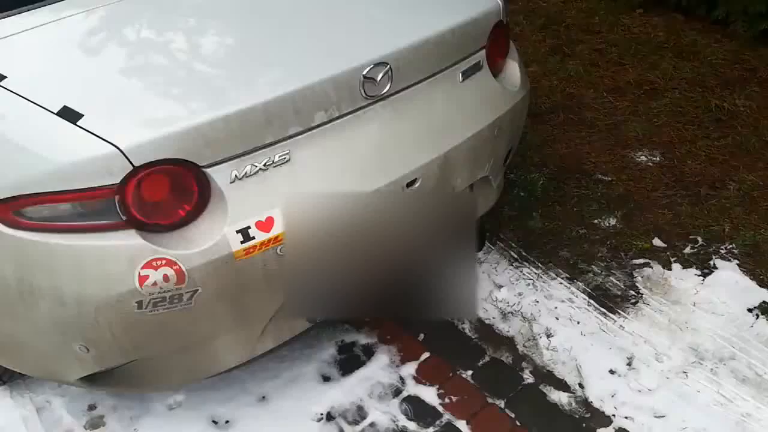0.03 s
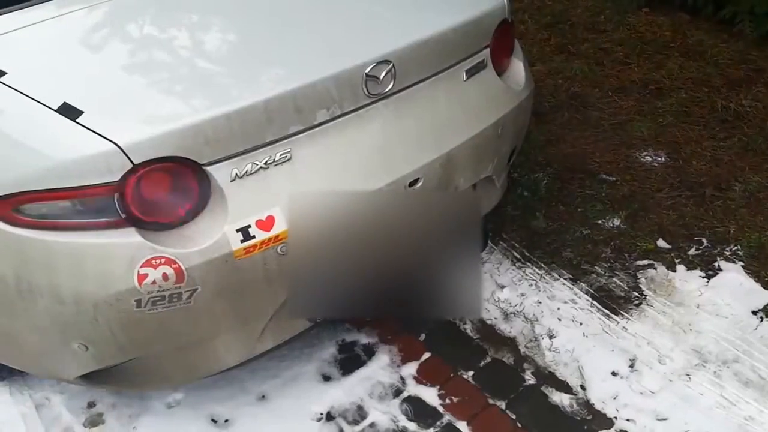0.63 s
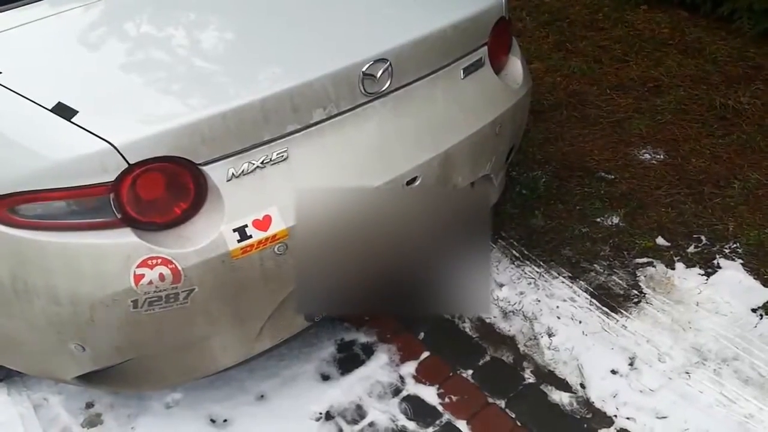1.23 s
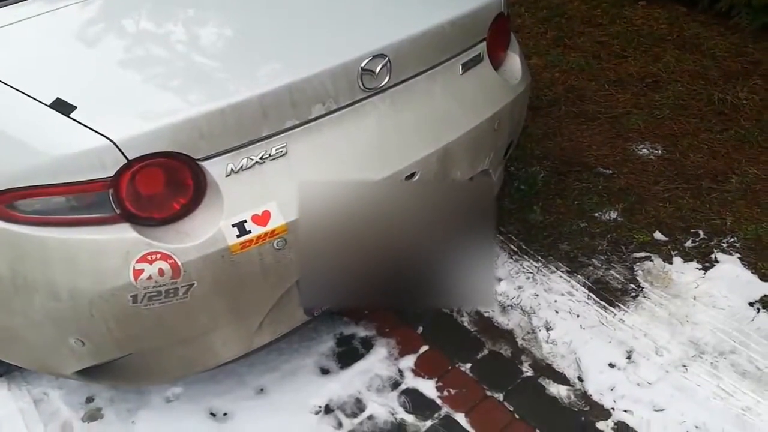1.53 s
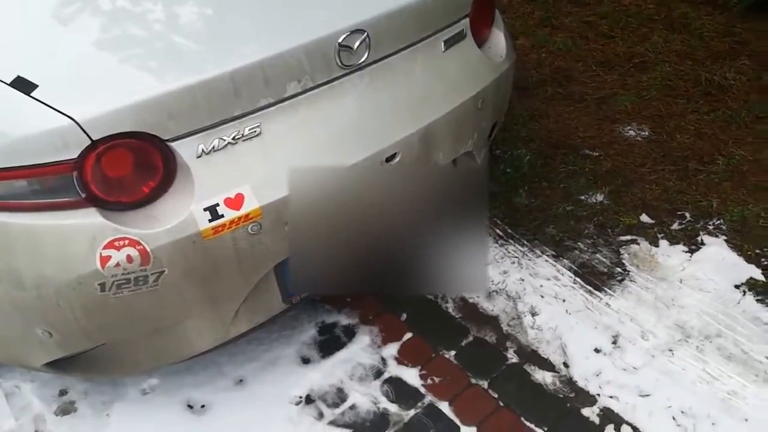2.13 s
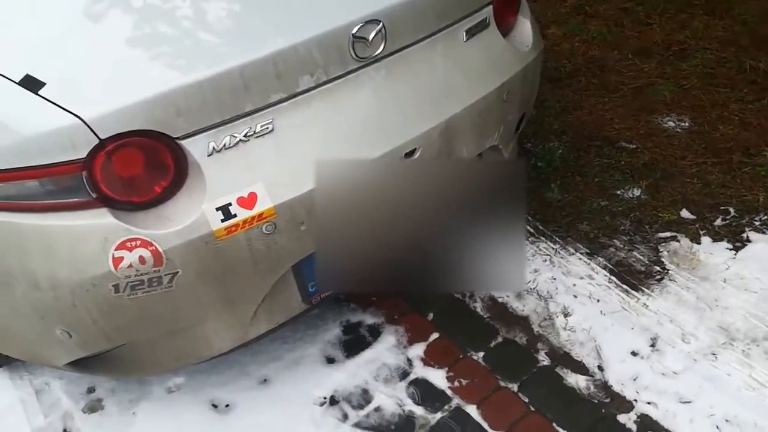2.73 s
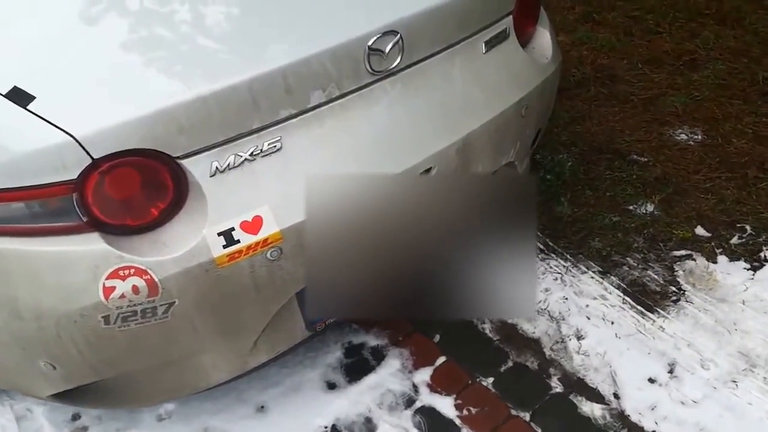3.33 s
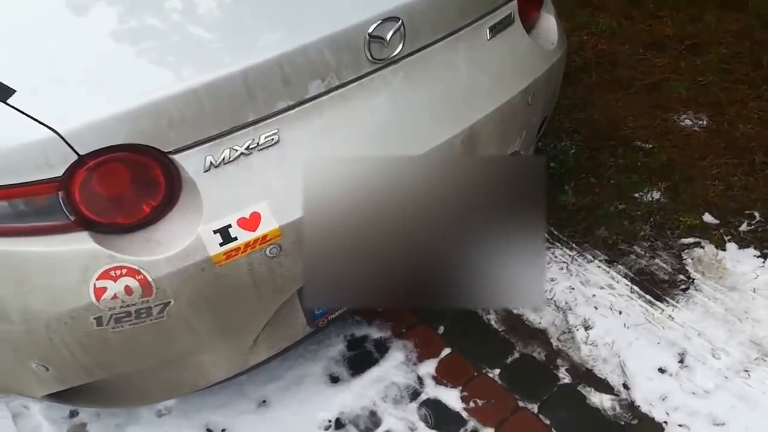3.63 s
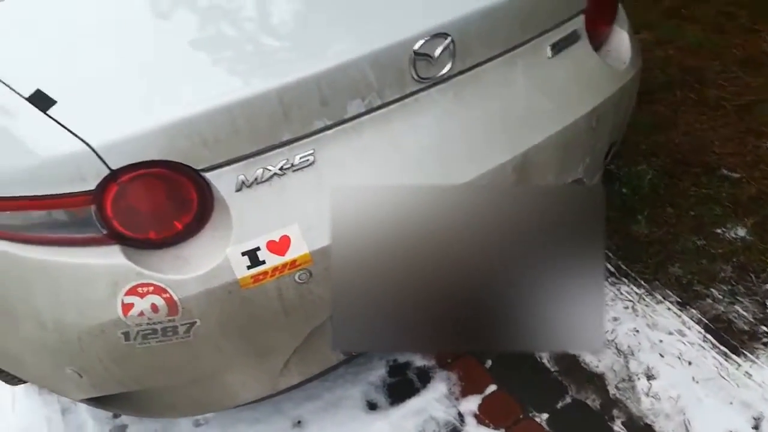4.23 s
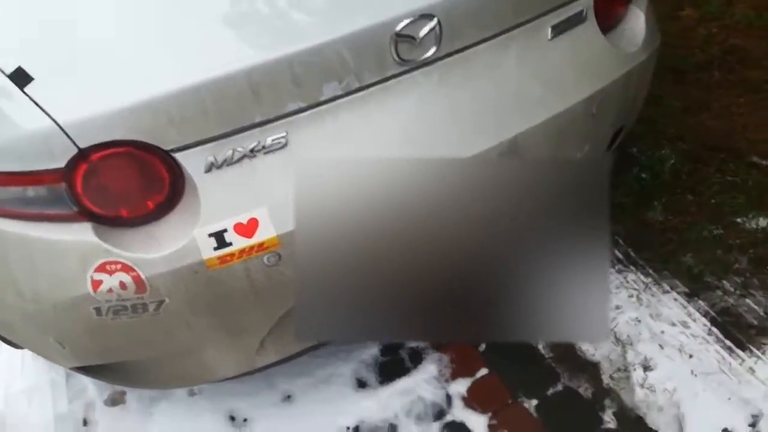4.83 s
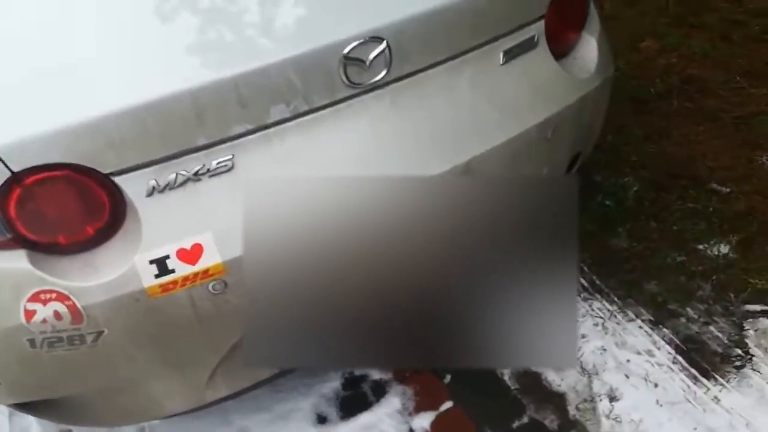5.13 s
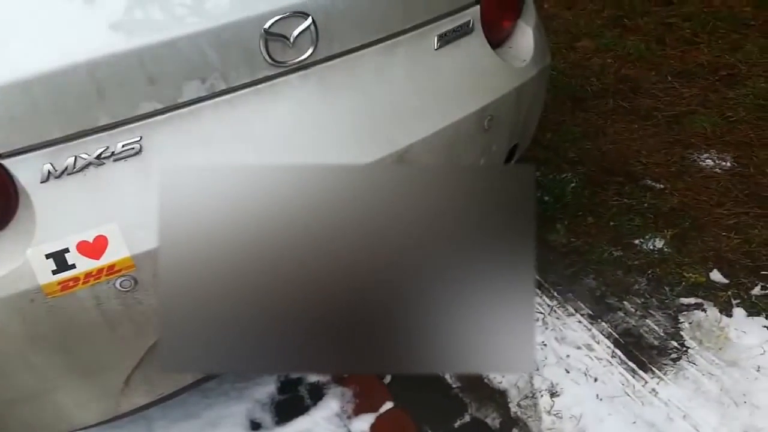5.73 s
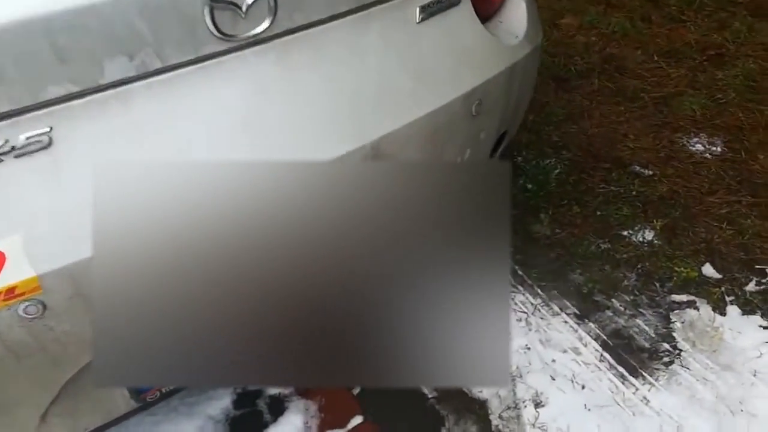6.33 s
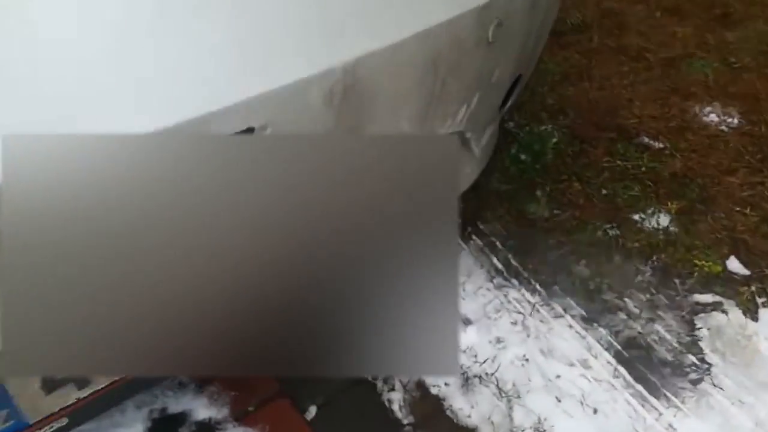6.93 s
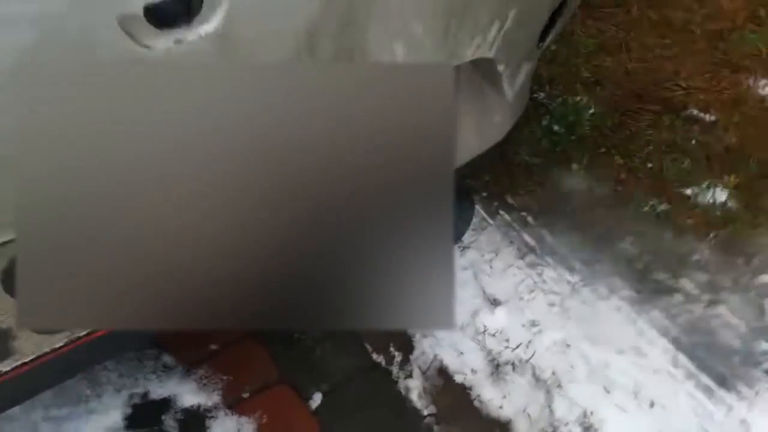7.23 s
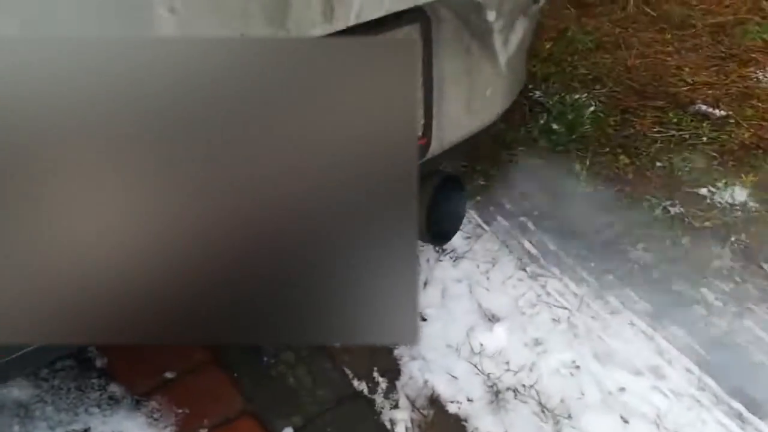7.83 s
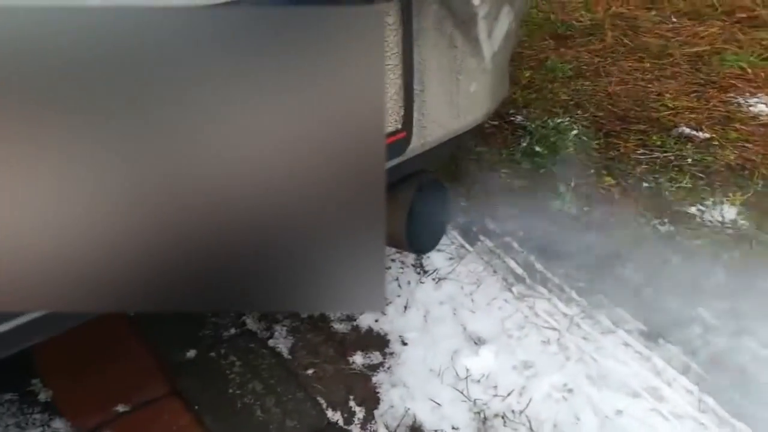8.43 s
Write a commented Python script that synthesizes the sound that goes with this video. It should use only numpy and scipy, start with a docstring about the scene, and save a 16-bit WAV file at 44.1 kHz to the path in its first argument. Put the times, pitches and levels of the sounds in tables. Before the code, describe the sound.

Outdoors, a parked car's engine flares for a moment just after starting, while an airy intake whistle swells and fades. The revs fall into a loping idle that booms through the silencer, each firing leaving the tailpipe as a puff and a burst of lightly ringing hiss. Two faint whines pass early on, above a constant low noise. The microphone moves toward the tailpipe and ends close beside it.

```python
"""Cold car settling to idle

A four-cylinder petrol car, just started, revs up and drops to idle as the microphone walks up to
its tailpipe. Each firing booms through the silencer and leaves the pipe as a sharp puff and a burst
of hiss. The cylinders are unequal, so the idle lopes (sounds uneven) ten times a second.
Behind it are an early whistle of intake air, two faint whines and a steady murmur."""
import sys
import numpy as np
from scipy import signal
from scipy.fft import rfft, irfft, next_fast_len
from scipy.io import wavfile
from scipy.ndimage import uniform_filter1d, minimum_filter1d, map_coordinates

SR = 44100
rng = np.random.default_rng(int(sys.argv[2]) if len(sys.argv) > 2 else 0)


def unload_wav(signal):
    """Save mono or channel-first audio to the path in sys.argv[1] as 16-bit WAV at rate SR, clipped to [-1, 1]."""
    wavfile.write(
        sys.argv[1],
        SR,
        np.round(np.clip(np.atleast_2d(signal).T, -1, 1) * 32767).astype(np.int16),
    )


N = 383669
TIME = np.arange(N) / SR

# each cylinder's jet of gas, in firing order: puff_db, puff_decay_s, hiss_db, hiss_decay_s
GAS_JETS = [(-3, .002, -7, .009), (2.5, .0019, -3.5, .012), (-7, .004, -5.5, .013), (-6, .0035, 2, .024)]


def firings(start_s, skip_s, jitter_s):
    """Each cylinder's firing times: the engine fires twice a turn."""
    # engine speed: time_s, speed_rpm
    speed = [(0.4, 1405.5), (0.5, 1539.4), (0.65, 1383.7), (1.04, 1215.8), (1.3, 1171.8), (2.01, 1214.0),
             (2.06, 1234.4), (3.4, 1212.9), (4.44, 1221.2), (4.7, 1187.5), (5.02, 1224.3), (5.68, 1221.7),
             (7.06, 1198.1), (7.3, 1175.0), (7.62, 1197.7), (8.7, 1173.2)]
    running = TIME[TIME >= start_s]
    rpm = np.interp(running, *np.transpose(speed))
    beats_so_far = np.cumsum(rpm) * 2 / 60 / SR
    beat = np.arange(int(beats_so_far[-1]) + 1)
    times = np.interp(beat, beats_so_far, running) + jitter_s * rng.standard_normal(len(beat))
    # at skip_s the rhythm jumps one beat, like a tiny cut in the sound
    cylinder = (beat + (times > skip_s)) % len(GAS_JETS)
    return [times[cylinder == k] for k in range(len(GAS_JETS))]


def boom(fired):
    """Pressure pulses ring the silencer; each of its tones carries differently to each place."""
    # each cylinder's pressure pulse: delay_s, size_db, fall_s
    cylinders = [(0.002, 4, 0.00053), (0.0037, 6, 0.00035), (0.0024, 3.5, 0.00015), (0.004, 8, 0.0017)]
    # tones of the silencer and pipe: pitch_hz, width_hz, far_gain, halfway_gain, close_gain
    silencer = [(59.9, 8.3, -0.3, -0.33, -0.39), (75.1, 23.6, -0.048, -0.118, -0.394),
                (84, 118.9, 0.1795, .2, 0.385), (118.3, 86.94, -0.3213, -0.343, -0.5325),
                (149.83, 7.58, 0.32, 0.41, 0.85), (195.1, 29, 0.115, 0.1334, 0.18),
                (256.4, 33, 0.107, 0.1296, -0.032), (273.4, 12.6, -0.03, -0.018, 0.072),
                (292.4, 9.3, 0.02, -0.0066, 0.045), (327, 33, 0.0014, -0.0027, 0.018),
                (427, 42, .002, 0.0033, .002)]
    usual_s = np.mean([delay_s for delay_s, _, _ in cylinders])
    pulses = np.zeros(N)
    for times, (delay_s, size_db, fall_s) in zip(fired, cylinders):
        # the timing starts even, then drifts 3/4 of the way to this cylinder's own delay
        late_s = usual_s + (delay_s - usual_s) * .75 * ramp(times, start_s=.64, length_s=.23)
        pulses += amp(size_db) * fading(kicks(times + late_s, scatter_db=1.14), fall_s) / fall_s
    hz, width, *gains = np.transpose(silencer)
    heard = filtered(pulses, lambda f: np.array(gains) @ resonance(f, hz[:, None], width[:, None]))
    return walk(*heard)


def puffs(fired, lag_s, front_db, eddy_db, echo_db, echo_decay_s, left_lag_s):
    """Each pulse leaves the pipe as a steep front, its cylinder's own ragged tail and fresh swirls."""
    # tone colour of the puffs at each place: pitch_hz, level_db
    far = [(200, -43.5), (340, -8), (380, 1), (480, -11), (580, 2.5), (700, -4.5), (915, 3.5),
           (1220, -12.5), (1400, -21), (1940, -22.5), (2600, -46), (5000, -64.5)]
    halfway = [(200, -33.5), (340, -19), (435, 3.5), (520, -8), (660, -1.5), (770, 2.5), (890, 3.5),
               (1250, -16.5), (1500, -19), (2600, -39), (5000, -61)]
    close = [(200, -29.5), (340, -10), (400, -14.5), (490, -15.5), (560, -7), (700, -0.5), (990, -7.5),
             (1350, -22.5), (1550, -24), (2600, -44), (5000, -61)]
    t = np.arange(SR // 20) / SR
    even_db = -8.5  # the puffs start alike, then drift apart in size
    gas = np.zeros((2, N))
    for times, (puff_db, decay_s, _, _) in zip(fired, GAS_JETS):
        size_db = even_db + (puff_db - even_db) * ramp(TIME, start_s=1, length_s=.57)
        kick = amp(size_db) * kicks(times + lag_s, scatter_db=2.1)
        # a short jet, then its echo under the car
        shape = np.exp(-t / decay_s) + amp(echo_db) * np.exp(-t / echo_decay_s)
        tail = signal.fftconvolve(kick, shape * rng.standard_normal(len(t)))[:N]
        eddies = signal.fftconvolve(kick, shape)[:N] * air()
        gas += tail + amp(eddy_db) * eddies - amp(front_db) * kick
    # the pipe is to the right, so the left ear hears it a little later
    gas = filtered(gas, lambda f: np.exp(1j * np.pi * np.outer([-left_lag_s, left_lag_s], f)))
    return walk(*[coloured(gas, colour) for colour in (far, halfway, close)])


def hiss(fired, lag_s, steady_flow):
    """Gas rushes out of the pipe, harder after every firing."""
    # tone colour of the hiss at each place: pitch_hz, level_db
    far = [(1290, -28), (2200, -20), (3100, -10.5), (3530, -3.5), (4160, -11.5), (5190, -4), (5770, -9),
           (6740, 1), (7310, -6.5), (8470, -9.5), (9810, -9), (10200, -15.5), (11500, -16), (13700, -26),
           (15500, -30.5)]
    halfway = [(1290, -46), (2200, -9.5), (2550, -18), (3830, -9), (4230, -7.5), (5490, -0.5), (6410, -9),
               (7020, -1.5), (8820, -10), (9570, -9), (10500, -16), (13800, -21.5), (15500, -30)]
    close = [(1290, -40), (2200, -8), (2470, -33), (3100, -7), (3710, -13), (4480, -0.5), (4980, -2.5),
             (5490, -2.5), (7370, -3.5), (8890, -10.5), (9890, -12.5), (14500, -25.5), (15500, -34)]
    flow = steady_flow + bursts(fired, lag_s, scatter_db=1.3)
    gas = flow * air()
    return walk(*[coloured(gas, colour) for colour in (far, halfway, close)])


def chirps(fired, lag_s, steady_flow):
    """Every burst rings the pipe's high tones, each at a new strength; each also swells and fades."""
    # tones that ring across the tailpipe: pitch_hz, width_hz, level_db
    pipe_tones = [(4315, 40, 0), (4530, 40, -1), (4918, 30, -1), (5045, 45, -2), (5308, 40, 3.5),
                  (5514, 40, 1), (5769, 35, -1), (6112, 30, -3), (6519, 50, -4), (9550, 50, -11),
                  (9690, 70, -8)]
    ring = np.zeros((2, N))
    for hz, width, db in pipe_tones:
        swell = amp(2.5 * map_coordinates(rng.standard_normal(40), [TIME * 4]))  # 4 levels a second
        flow = steady_flow + bursts(fired, lag_s, scatter_db=4.5)
        gas = swell * flow * rng.standard_normal((2, N))
        peak = signal.iirpeak(hz, hz / (2 * width), SR)
        ring += amp(db) * signal.lfilter(*peak, signal.lfilter(*peak, gas))
    return unit(ring)


def bursts(fired, lag_s, scatter_db):
    """Gas flow that jumps at every firing and dies away."""
    return sum(amp(db) * fading(kicks(times + lag_s, scatter_db), decay_s)
               for times, (_, _, db, decay_s) in zip(fired, GAS_JETS))


def intake(peak_s, hold_s, rise_db_per_s, fall_db_per_s):
    """Air whistles past the closing throttle: it swells, holds and dies away."""
    # tones of the air intake: pitch_hz, width_hz, level_db
    tones = [(4800, 340, 4), (6800, 500, -6), (8360, 590, 2)]
    response = lambda f: sum(amp(db) * resonance(f, hz, width) ** 2 for hz, width, db in tones)
    before_s = np.maximum(peak_s - TIME, 0)
    after_s = np.maximum(TIME - peak_s - hold_s, 0)
    swell = amp(-rise_db_per_s * before_s - fall_db_per_s * after_s)
    return swell * unit(filtered(air(), response))


def whine(pitch_hz):
    """A thin tone comes and goes, each time in one smooth swell."""
    # the swells: loudest_s, length_s, level_db
    swells = [(2.303, 0.12, -51), (2.677, 0.74, -56)]
    level = sum(amp(db) * np.sin(np.pi * ramp(TIME, loudest_s - length_s / 2, length_s)) ** 2
                for loudest_s, length_s, db in swells)
    return level * unit(np.sin(2 * np.pi * pitch_hz * TIME))


def murmur():
    """The engine bay and the yard make a steady, low noise."""
    # its tone colour: pitch_hz, level_db
    colour = [(15, -21.5), (40, -1.5), (130, 9), (260, 8.5), (350, -3), (550, -8), (900, -17.5),
              (1250, -21.5), (2000, -25.5), (3000, -31), (8000, -53)]
    return unit(filtered(air(), lambda f: amp(along(colour, f))))


def walk(far, halfway, close):
    """Blend from far to halfway to close as the microphone nears the tailpipe."""
    # times of the walk: leave_far_s, reach_halfway_s, leave_halfway_s, reach_close_s
    walk_times = [1.7, 3.0, 6.101, 7.3]
    leaving = np.interp(TIME, walk_times[:2], [1, 0])
    arriving = np.interp(TIME, walk_times[2:], [0, 1])
    return leaving * far + (1 - leaving - arriving) * halfway + arriving * close


def air():
    """White stereo noise, alike in the bass and unrelated in the treble."""
    # how alike left and right are: pitch_hz, likeness (0 to 1)
    likeness = [(100, 0.65), (300, 0.42), (900, 0.42), (1600, 0.62), (3000, 0), (12000, 0)]
    angle = lambda f: np.arccos(np.clip(along(likeness, f), -1, 1)) / 2
    noise = rng.standard_normal((2, N))
    mid, side = filtered(noise, lambda f: np.array([np.cos(angle(f)), np.sin(angle(f))]))
    return np.array([mid + side, mid - side])


def kicks(times, scatter_db):
    """One click of random size at each time."""
    sizes = amp(scatter_db * rng.standard_normal(len(times)))
    return np.bincount(np.round(times * SR).astype(int), sizes, N)[:N]


def fading(x, decay_s):
    """Each click becomes a step that dies away."""
    return signal.lfilter([1], [1, -np.exp(-1 / (decay_s * SR))], x)


def resonance(f, hz, width):
    """Filter response of one ringing tone, gain 1 at its centre."""
    return 1j * f * width / (hz * hz - f * f + 1j * f * width)


def coloured(x, colour):
    """Give x a tone colour, at average level 1."""
    return unit(filtered(x, lambda f: causal(amp(along(colour, f)))))


def causal(gain):
    """A filter response with this gain that rings only after its cause."""
    cepstrum = irfft(np.log(np.maximum(gain, 1e-6)))
    half = len(cepstrum) // 2
    forward_only = np.r_[1, np.full(half - 1, 2), 1, np.zeros(half - 1)]
    return np.exp(rfft(cepstrum * forward_only))


def filtered(x, response):
    """Scale and delay each frequency in x as response(hz) says."""
    size = 2 * next_fast_len(N // 2 + SR // 4)
    hz = np.fft.rfftfreq(size, 1 / SR)
    return irfft(rfft(x, size) * response(hz), size)[..., :N]


def along(points, hz):
    """Read between (pitch_hz, value) points on a log scale of pitch."""
    pitches, values = np.transpose(points)
    return np.interp(np.log(hz + 1), np.log(pitches + 1), values)


def ramp(t, start_s, length_s):
    """0 before start_s, rising evenly to 1 over length_s."""
    return np.clip((t - start_s) / length_s, 0, 1)


def amp(db):
    """Decibels to gain."""
    return 10 ** (np.asarray(db) / 20)


def unit(x):
    """Scale x to an average (rms) level of 1."""
    return x / np.sqrt(np.mean(x ** 2) + 1e-20)


def scene():
    """The exhaust sounds all follow the same firings and change as the microphone walks."""
    # gain of each exhaust sound: far_db, halfway_db, close_db
    boom_db = (-39.5, -41.5, -42.5)
    puff_db = (-33, -35, -33.5)
    hiss_db = (-44.5, -44.5, -44.5)
    fired = firings(start_s=.4, skip_s=5.43, jitter_s=.00012)
    low = amp(walk(*boom_db)) * boom(fired)
    middle = amp(walk(*puff_db)) * puffs(fired, lag_s=.005, front_db=19, eddy_db=-4,
                                         echo_db=-16, echo_decay_s=.012, left_lag_s=.0001)
    rush = hiss(fired, lag_s=.0048, steady_flow=.59)
    ring = amp(-4.5) * chirps(fired, lag_s=.0076, steady_flow=.06)
    whistle = amp(-47) * intake(peak_s=.72, hold_s=.3, rise_db_per_s=94, fall_db_per_s=20)
    lean_right = amp([[-1], [1]])
    high = (amp(walk(*hiss_db)) * (rush + ring) + whistle) * lean_right
    return low + middle + high + amp(-27.5) * murmur() + whine(pitch_hz=1594)


def record(dry):
    """The microphone opens abruptly, smoothly holds its peaks down and cuts the highest treble."""
    open_s, ceiling, smooth_samples, top_hz = .405, .92, 220, 15750
    needed_gain = ceiling / np.maximum(np.abs(dry).max(axis=0), ceiling)
    gain = uniform_filter1d(minimum_filter1d(needed_gain, 2 * smooth_samples), smooth_samples)
    return filtered(dry * gain * (TIME >= open_s), lambda f: f < top_hz)


dry = scene()
out = record(dry)
unload_wav(out)
```